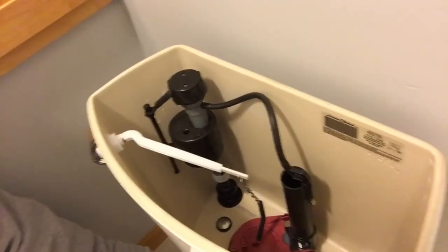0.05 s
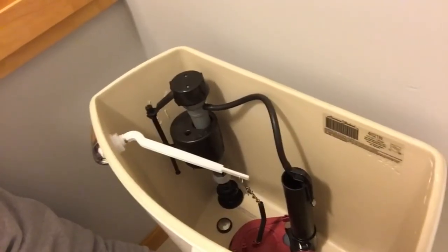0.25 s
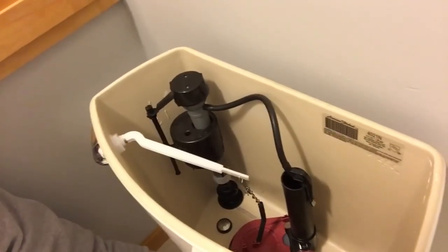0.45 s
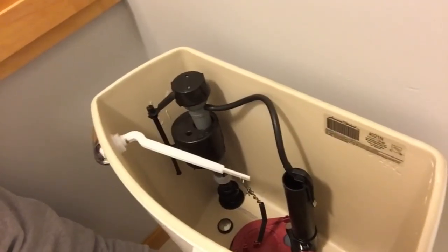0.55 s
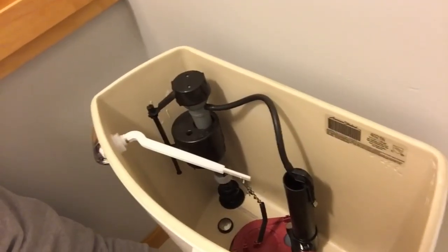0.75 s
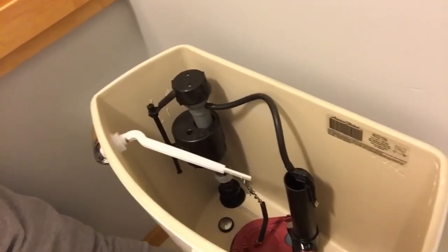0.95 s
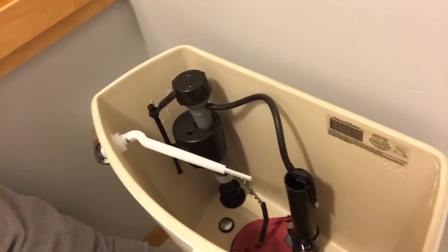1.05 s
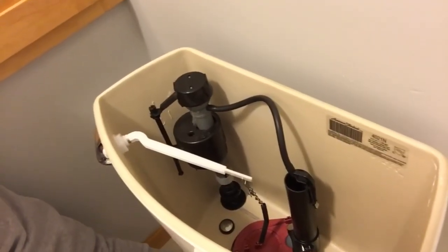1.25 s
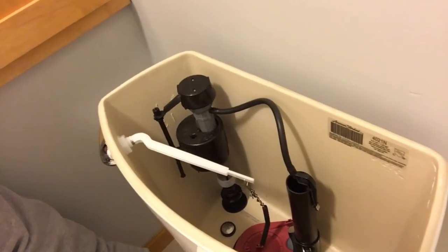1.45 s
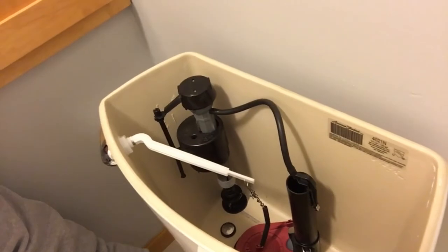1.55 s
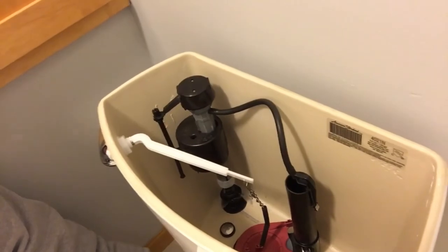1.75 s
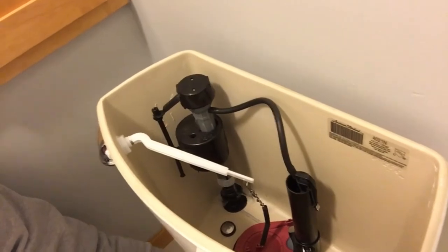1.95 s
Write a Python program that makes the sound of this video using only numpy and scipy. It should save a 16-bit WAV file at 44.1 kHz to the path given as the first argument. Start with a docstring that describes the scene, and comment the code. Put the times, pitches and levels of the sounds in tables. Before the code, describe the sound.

A toilet tank's fill valve squeals on one high note that turns raspy, then lets go with a chirp and a spurt. Water hisses and fades, with small splashes and plops, heard close in a small bathroom.

```python
"""A faint leaking hiss, then the squeal of a toilet tank's fill valve in a small bathroom.
The valve's seal sings cleanly at first, then flutters and rasps as water forces past it.
It lets go with two chirps and a spurt, and the jet settles to a hiss that rings in tank and pipe.
Air spits through the valve, water splashes at the inlet, drops plop and glug into the tank
and a few tick on the fittings, all over a low room tone."""
import sys
import numpy as np
from scipy import signal
from scipy.fft import rfft, irfft, next_fast_len
from scipy.io import wavfile
from scipy.ndimage import uniform_filter1d, map_coordinates

SR = 44100
rng = np.random.default_rng(int(sys.argv[2]) if len(sys.argv) > 2 else 0)


def persist_wave(psi):
    """Save psi, clipped to +-1, as 16-bit WAV."""
    counts = np.round(np.clip(psi, -1, 1) * 32767).astype(np.int16)
    wavfile.write(sys.argv[1], SR, np.atleast_2d(counts).T)


N = 88200

# the note the seal sings: time_s, pitch_hz
SEAL_PITCH = [(.2, 1422), (.245, 1404), (.3, 1401), (.48, 1414), (.605, 1427), (.68, 1418), (.73, 1395),
              (.768, 1374), (.79, 1405), (.835, 1405), (.87, 1422), (.92, 1412), (.95, 1432), (.975, 1422),
              (1.04, 1428)]
# level rides for the squeal's first three harmonics and its upper stack: time_s, level_db
FUNDAMENTAL_LEVEL = [(.208, -26.5), (.236, -24), (.262, -44.5), (.276, -30), (.35, -30.5), (.396, -45),
                     (.44, -30), (.457, -36.5), (.487, -23.5), (.518, -23), (.538, -45.5), (.555, -24),
                     (.585, -24.5), (.633, -42), (.67, -35), (.703, -27), (.725, -40.5), (.745, -25),
                     (.805, -26.5), (.828, -42), (.915, -20), (.958, -36.5), (.99, -21.5), (1.02, -18.5),
                     (1.03, -27)]
OCTAVE_LEVEL = [(.21, -32.5), (.262, -26), (.385, -35.5), (.447, -56), (.49, -35), (.58, -31.5),
                (.645, -33), (0.696, -39), (0.719, -26.5), (.755, -30.5), (0.775, -17.5), (.79, -27),
                (0.828, -23), (0.863, -33.5), (.878, -27.5), (.91, -33), (.955, -26), (0.982, -38),
                (1.022, -36)]
THIRD_LEVEL = [(0.21, -44), (0.232, -39.5), (0.512, -47.5), (0.542, -52), (0.646, -51), (0.77, -32),
               (0.792, -38), (1.02, -40)]
UPPER_LEVEL = [(.2, -52), (.27, -41), (.33, -46), (.39, -49), (.52, -50.5), (.61, -55.5), (.68, -50),
               (.74, -42.5), (.83, -44.5), (.92, -46), (1.02, -48.5)]
# the upper stack: harmonic_number, offset_db, swell_share
UPPER_PARTIALS = [(4, -1, 1.14), (5, -3.5, 0.66), (6, -1, 1.6), (7, -8.5, 1.3), (8, -18.5, 1.1),
                  (9, -17, .8), (10, -21.5, .8), (11, -25, .8)]
SQUEAL_START_S, SQUEAL_STOP_S = .199, 1.018
SQUEAL_ATTACK_S, SQUEAL_RELEASE_S, FUNDAMENTAL_T60_S = 0.011, 0.0065, .28
# how hard the seal flutters: time_s, roughness_0_to_1
ROUGHNESS = [(.2, 0.01), (.26, 0.11), (.69, 0.02), (.77, 0.86), (.94, 0.8), (.985, 0.27), (1.015, 0.3),
             (1.03, 0.92)]
FLUTTER_PER_S, DRIFT_DB = 140, 3.2
JITTER_HZ, SHIMMER_DB, SHAKE_RAD = 3.4, 3.5, 0.34  # on the fundamental, at full roughness
RASP_DB, RASP_HALF_WIDTH_HZ = -14.5, 109
# the seal's last chirps as it slips: start_s, level_db, pitch_hz
SEAL_CHIRPS = [(1.017, -19, 2950), (1.029, -12.5, 2980)]
CHIRP_T60_S, CHIRP_RISE = 0.034, 0.0303

# water through the valve: time_s, body_db, fizz_db
JET_LEVELS = [(0, -77, -80.5), (.195, -63, -92), (.212, -54, -60), (.26, -86, -83), (.46, -83, -75),
              (.56, -95.5, -78), (.69, -78, -74), (.735, -52.5, -54.5), (.78, -46.5, -54.5),
              (.86, -41.5, -44.5), (.92, -43, -42.5), (1.01, -45.5, -47.5), (1.024, -32, -36.5),
              (1.041, -35, -40.5), (1.049, -31, -35), (1.082, -31, -38.5), (1.1, -36.5, -40),
              (1.17, -36, -40.5), (1.25, -38.5, -41.5), (1.33, -43.5, -45.5), (1.38, -48.5, -46),
              (1.55, -48.5, -49.5), (1.66, -56, -52.5), (1.78, -52, -50), (1.85, -55, -54), (2, -58.5, -54)]
# EQ of the jet's body and of its fizz: frequency_hz, gain_db
BODY_EQ = [(120, -27.5), (220, -6), (280, -3), (400, -16), (520, -14), (700, 1), (900, -7), (1100, -4),
           (1400, -2.5), (1650, 1.5), (2050, -1.5), (2700, -2), (3500, -4.5), (5000, -29.5)]
FIZZ_EQ = [(1000, -43.5), (2500, -5), (3500, -1), (5000, 1.5), (7000, -1), (8500, -10.5), (11000, -13),
           (15500, -18.5)]
# resonances of tank and pipe: centre_hz, width_hz, gain_db
TANK_MODES = [(251, 35, -4.5), (898, 29, 11.5), (1053, 52, -6), (1274, 15, 8.5), (1412, 40, -2),
              (1867, 77, 7), (2096, 244, 1.5), (2535, 70, -4.5), (3230, 50, 5)]
TANK_DB, SURGE_DB, PATCHY_DB = -1.5, 1.87, 3
SPRAY_PER_S, SPRAY_DB, SPRAY_SPREAD_DB = 340, -7, -6
# EQ of the spurt as the seal lets go: frequency_hz, gain_db
SPURT_EQ = [(1200, -16), (2050, 11.5), (2600, 6.5), (3300, -8), (4300, -14), (5500, 1), (6600, 4),
            (8500, -5), (10000, -10.5), (12000, -17), (15500, -27)]
SPURT_START_S, SPURT_HOLD_S, SPURT_DB, SPURT_T60_S = 1.044, 0.039, -27.5, 0.13
# air spitting through the valve: start_s, level_db
AIR_SPITS = [(0.774, -30.5), (.815, -40), (0.919, -34.5), (1.019, -31.5), (1.284, -36), (1.63, -28.5)]
SPIT_ATTACK_S, SPIT_T60_S, SPIT_FIZZ_DB = 0.0023, 0.033, -8

# drops that trap a bubble: start_s, level_db, pitch_hz
DROP_PLOPS = [(1.4915, -20.5, 784), (1.506, -30.5, 898), (1.548, -32.5, 786), (1.630, -25.5, 801),
              (1.631, -31.5, 1466), (1.643, -29, 921)]
PLOP_T60_S, PLOP_RISE = 0.035, 0.315
# resonances of the air in the tank: centre_hz, width_hz, gain_db
CAVITY_MODES = [(930, 15, -11.5), (1040, 12, 1)]
CAVITY_DB = -13
# low glugs: start_s, level_db, pitch_hz
LOW_GLUGS = [(1.495, -43, 238), (1.55, -47, 232), (1.802, -44.5, 213)]
GLUG_T60_S, GLUG_RISE = 0.12, .08
BLIP_ATTACK_S, BLIP_GLIDE_S = .0026, .014  # shared by chirps, plops and glugs
# splashes at the inlet: start_s, level_db
INLET_SPLASHES = [(1.317, -30), (1.332, -28), (1.38, -38), (1.421, -32), (1.468, -35), (1.488, -35.5),
                  (1.501, -36), (1.568, -33), (1.582, -35), (1.709, -29), (1.759, -36), (1.782, -44),
                  (1.99, -42)]
# resonances of the inlet tube: centre_hz, width_hz, gain_db
INLET_MODES = [(2205, 110, 6), (2680, 200, -3.5), (3690, 750, -7), (4360, 240, -8), (5240, 200, 0),
               (6660, 400, -33)]
SPLASH_ATTACK_S, SPLASH_T60_S, SPLASH_TOP_HZ = 0.0017, 0.027, 7040
# drops ticking on the fittings: start_s, level_db, centre_hz, width_octaves
DROP_TICKS = [(1.525, -44.5, 9100, .6), (1.629, -40.5, 10100, .6), (1.769, -33, 5700, 0.14),
              (1.868, -38, 8460, 0.41), (1.912, -43.5, 10100, .5), (1.927, -24.5, 5760, 0.069)]

# the thin leak before the jet breaks through: time_s, level_db
LEAK_LEVEL = [(0, -87), (.06, -77), (.1, -65.5), (.19, -58.5), (.215, -57), (.26, -65), (.45, -65.5),
              (.56, -78.5), (.7, -62.5), (.8, -73)]
# resonances that colour the leak: centre_hz, width_hz, gain_db
LEAK_RESONANCES = [(2620, 110, 2), (3040, 110, 1.5), (3290, 48, -1), (3920, 150, 3), (4100, 150, 3),
                   (5860, 350, -25)]
# EQ of the shaking pipe: frequency_hz, gain_db
RUMBLE_EQ = [(50, -20.5), (110, -4), (160, 1), (230, -4), (350, -24), (800, -44)]
# EQ of the bathroom's quiet bed: frequency_hz, gain_db
ROOM_TONE_EQ = [(20, -31), (35, -13), (48, 6), (60, -5.5), (85, -1.5), (180, -0.5), (250, -5), (330, -13.5),
                (600, -17), (1200, -24.5), (2000, -32.5), (3500, -28), (8000, -45), (15000, -48)]
RUMBLE_DB, ROOM_TONE_DB = -55, -59
# the bathroom's reverb time: frequency_hz, t60_s
ROOM_DECAY = [(200, 0.37), (1000, 0.52), (5000, 0.47), (14000, 0.44)]
SQUEAL_SEND_DB, DROP_SEND_DB, TOP_HZ = -10.5, -8, 15950


def squeal():
    """The seal vibrates in a harmonic stack; flutter shakes its pitch and each partial's level."""
    t = clock()
    pitch, = curves(SEAL_PITCH)
    rough, = curves(ROUGHNESS)
    upper_db, = curves(UPPER_LEVEL)
    phase = 2 * np.pi * np.cumsum(pitch + JITTER_HZ * rough * wobble(FLUTTER_PER_S)) / SR
    onset = np.sin(np.pi / 2 * np.clip((t - SQUEAL_START_S) / SQUEAL_ATTACK_S, 0, 1)) ** 2
    after_s = np.maximum(t - SQUEAL_STOP_S, 0)
    levels = [curves(rows)[0] for rows in (FUNDAMENTAL_LEVEL, OCTAVE_LEVEL, THIRD_LEVEL)]
    swell_db = upper_db - upper_db.mean()
    for _, offset_db, share in UPPER_PARTIALS:
        levels.append(upper_db.mean() + offset_db + share * swell_db + DRIFT_DB * wobble(per_s=18.04))
    stack = np.zeros(N)
    for k, db in enumerate(levels, 1):
        attack = onset ** min(k, 4)  # the overtones come in last
        release = decay(after_s, FUNDAMENTAL_T60_S) if k == 1 else np.exp(-after_s / SQUEAL_RELEASE_S)
        shimmer_db = SHIMMER_DB * rough * wobble(FLUTTER_PER_S)
        shake = SHAKE_RAD * np.sqrt(k) * rough * wobble(FLUTTER_PER_S)
        stack += amp(db + shimmer_db) * attack * release * np.sin(k * phase + shake)
    return np.sqrt(2) * stack


def rasp(tone):
    """Water forced past the fluttering seal smears every partial with noise."""
    rough, = curves(ROUGHNESS)
    eddies = unit(filtered(white(), lambda hz: 1 / (1 + (hz / RASP_HALF_WIDTH_HZ) ** 2)))
    return tone * (1 + amp(RASP_DB) * rough * eddies)


def jet():
    """The jet rushes in the tank and fizzes with fine spray; both surge together."""
    body_db, fizz_db = curves(JET_LEVELS)
    surge_db = SURGE_DB * wobble(per_s=70.11)
    clicks = (rng.random(N) < SPRAY_PER_S / SR) * rng.choice([-1, 1], N)
    droplets = clicks * amp(SPRAY_SPREAD_DB * np.minimum(rng.exponential(size=N), 3))
    fizz = coloured(turbulence() + amp(SPRAY_DB) * unit(droplets), FIZZ_EQ)
    return amp(body_db + surge_db) * in_tank(turbulence()) + amp(fizz_db + surge_db) * fizz


def spurt():
    """Spray shoots out as the seal lets go, holds briefly and dies."""
    age = clock() - SPURT_START_S
    attack = np.clip(age / 0.0027, 0, 1)
    release = decay(np.maximum(age - SPURT_HOLD_S, 0), SPURT_T60_S)
    return amp(SPURT_DB) * attack * release * coloured(turbulence(), SPURT_EQ)


def spits():
    """Pockets of air burst through the valve."""
    noise = in_tank(turbulence()) + amp(SPIT_FIZZ_DB) * coloured(turbulence(), FIZZ_EQ)
    return noise * sum(amp(db) * burst(s, SPIT_ATTACK_S, SPIT_T60_S) for s, db in AIR_SPITS)


def plops():
    """Drops trap bubbles, which bend up in pitch near the surface and set the tank's air ringing."""
    bubbles = blips(DROP_PLOPS, PLOP_T60_S, PLOP_RISE)
    return bubbles + amp(CAVITY_DB) * bubbles.std() * ringing(bubbles, CAVITY_MODES)


def splashes():
    """Small gushes splash and ring the inlet tube."""
    tube = ringing(white(), INLET_MODES)
    noise = unit(filtered(tube, lambda hz: 1 / (1 + (hz / SPLASH_TOP_HZ) ** 6)))
    return noise * sum(amp(db) * burst(s, SPLASH_ATTACK_S, SPLASH_T60_S) for s, db in INLET_SPLASHES)


def ticks():
    """Small drops strike the hard fittings, each a snap of bright, band-passed noise."""
    hits = np.zeros(N)
    for start_s, db, centre_hz, octaves in DROP_TICKS:
        ring = filtered(white(), lambda hz: 1 / (1 + (np.log2((hz + 1) / centre_hz) / octaves) ** 2))
        hits += amp(db) * burst(start_s, attack_s=.0004, t60_s=0.018) * unit(ring)
    return hits


def leak():
    """A thread of water hisses past the nearly closed seal."""
    level_db, = curves(LEAK_LEVEL)
    hiss = ringing(turbulence(), LEAK_RESONANCES)
    thin = filtered(hiss, lambda hz: 1 / (1 + (2300 / (hz + 1)) ** 8))  # steep low cut
    return amp(level_db) * unit(thin)


def rumble():
    """The fluttering seal shakes the pipe until it lets go."""
    rough, = curves(ROUGHNESS)
    fade = np.exp(-np.maximum(clock() - SQUEAL_STOP_S, 0) / SQUEAL_RELEASE_S)
    return amp(RUMBLE_DB) * rough * fade * coloured(white(), RUMBLE_EQ)


def in_tank(x):
    """Tank and pipe give x a broad body and narrow resonances, at rms 1."""
    return unit(coloured(x, BODY_EQ) + amp(TANK_DB) * ringing(x, TANK_MODES))


def bathroom_reverb(x):
    """The bathroom's tail: each frequency dies at its own speed."""
    hz, t, spectra = signal.stft(rng.standard_normal(SR // 2), SR, nperseg=256)
    tail = signal.istft(spectra * decay(t, along(ROOM_DECAY, hz)[:, None]), SR, nperseg=256)[1]
    impulse = np.pad(tail, (180, 0)) / np.linalg.norm(tail)  # 4 ms of pre-delay
    return signal.fftconvolve(x, impulse)[:N]


def blips(rows, t60_s, rise):
    """Short ringing tones that glide up by the fraction rise of their pitch."""
    tones = np.zeros(N)
    for start_s, db, hz in rows:
        age = np.maximum(clock() - start_s, 0)
        pitch = hz * (1 + rise * (1 - np.exp(-age / BLIP_GLIDE_S))) * (age > 0)
        phase = 2 * np.pi * np.cumsum(pitch) / SR
        tones += amp(db) * burst(start_s, BLIP_ATTACK_S, t60_s) * np.sin(phase)
    return tones


def turbulence():
    """Churning noise: patches of random gain across time and frequency."""
    spectra = signal.stft(white(), nperseg=512)[2]
    patches = uniform_filter1d(rng.standard_normal(spectra.shape), size=5, axis=0)
    patches = uniform_filter1d(patches, size=6, axis=1)
    return unit(signal.istft(spectra * amp(PATCHY_DB * unit(patches)), nperseg=512)[1][:N])


def ringing(x, modes):
    """x through a bank of resonators, at rms 1."""
    def response(hz):
        return sum(amp(db) * 1j * hz * width / (centre ** 2 - hz ** 2 + 1j * hz * width)
                   for centre, width, db in modes)
    return unit(filtered(x, response))


def coloured(x, eq):
    """x through an EQ curve, at rms 1."""
    return unit(filtered(x, lambda hz: amp(along(eq, hz))))


def filtered(x, response):
    """x shaped by a frequency response."""
    size = next_fast_len(N + SR // 2)
    return irfft(rfft(x, size) * response(np.fft.rfftfreq(size, 1 / SR)), size)[:N]


def burst(start_s, attack_s, t60_s):
    """An envelope that rises softly and dies away."""
    age = np.maximum(clock() - start_s, 0)
    return (1 - np.exp(-(age / attack_s) ** 2)) * decay(age, t60_s)


def decay(age, t60_s):
    """A fade that loses 60 dB every t60_s."""
    return np.exp(-np.log(1000) * age / t60_s)


def wobble(per_s):
    """A smooth random curve with per_s knots a second."""
    return map_coordinates(rng.standard_normal(2048), [clock() * per_s], mode="wrap")


def curves(rows):
    """An automation curve for each column after the time."""
    times, *columns = np.transpose(rows)
    return [np.interp(clock(), times, column) for column in columns]


def along(points, hz):
    """Read (frequency, value) points on a log frequency axis."""
    frequencies, values = np.transpose(points)
    return np.interp(np.log(hz + 1), np.log(frequencies + 1), values)


def white():
    """Fresh white noise."""
    return rng.standard_normal(N)


def clock():
    """Each sample's time in seconds."""
    return np.arange(N) / SR


def amp(db):
    """Decibels to gain."""
    return 10 ** (np.asarray(db) / 20)


def unit(x):
    """Scaled to rms 1."""
    return x / np.sqrt(np.mean(x ** 2) + 1e-20)


def scene():
    """Valve, water and drops in mono; the seal and the short hits feed the bathroom's reverb."""
    seal = rasp(squeal()) + blips(SEAL_CHIRPS, CHIRP_T60_S, CHIRP_RISE)
    water = leak() + jet() + spurt() + rumble()
    hits = spits() + splashes() + plops() + blips(LOW_GLUGS, GLUG_T60_S, GLUG_RISE) + ticks()
    room_tone = amp(ROOM_TONE_DB) * coloured(white(), ROOM_TONE_EQ)
    reverb = bathroom_reverb(amp(SQUEAL_SEND_DB) * seal + amp(DROP_SEND_DB) * hits)
    mono = seal + water + hits + reverb + room_tone
    return np.array([mono, mono])


def record(dry):
    """A brick-wall high cut at TOP_HZ."""
    return np.array([filtered(channel, lambda hz: hz < TOP_HZ) for channel in dry])


dry = scene()
out = record(dry)
persist_wave(out)
```